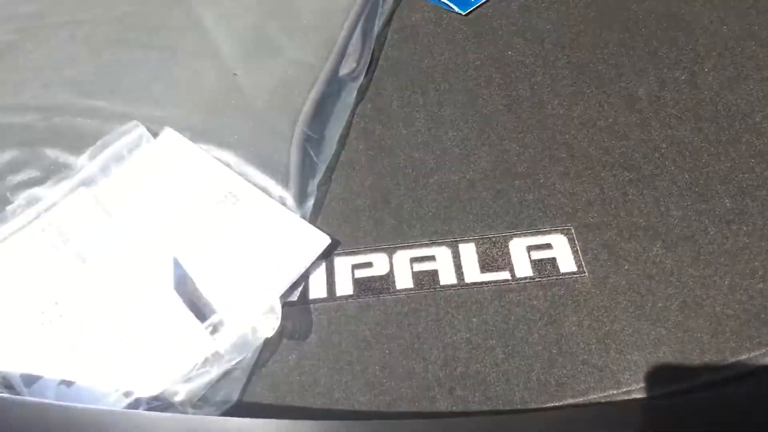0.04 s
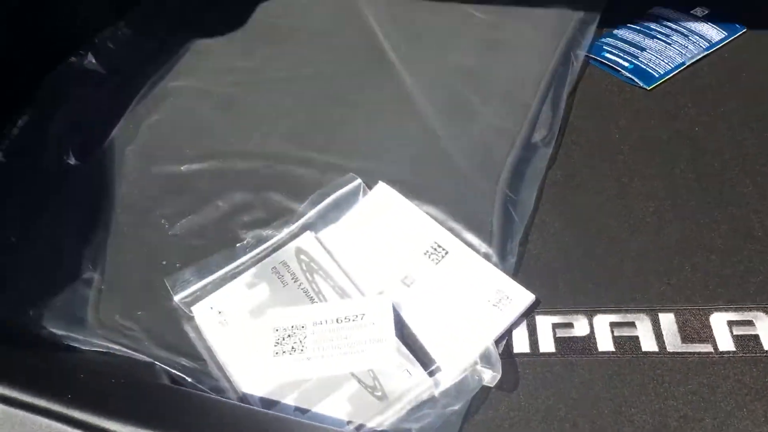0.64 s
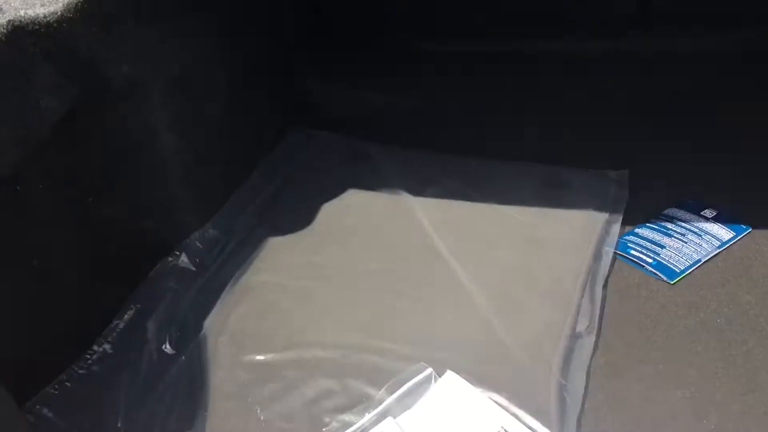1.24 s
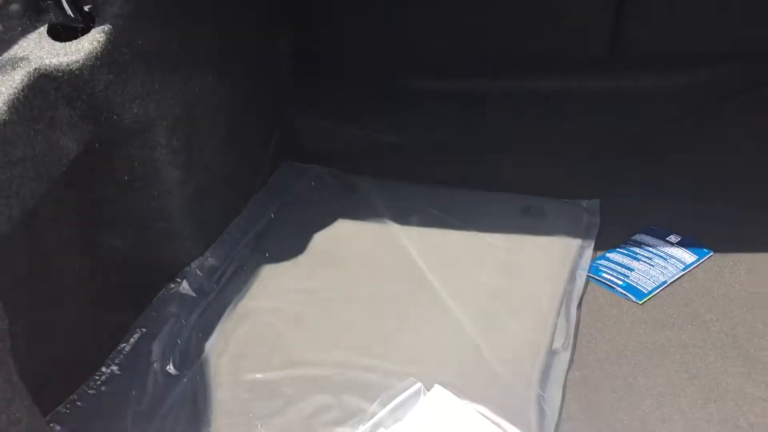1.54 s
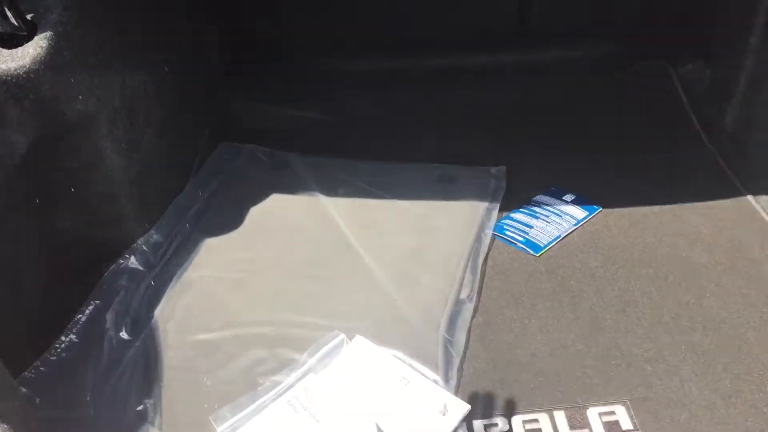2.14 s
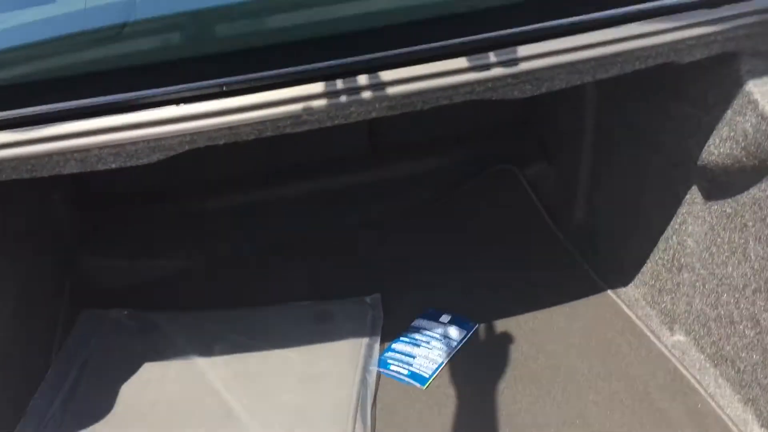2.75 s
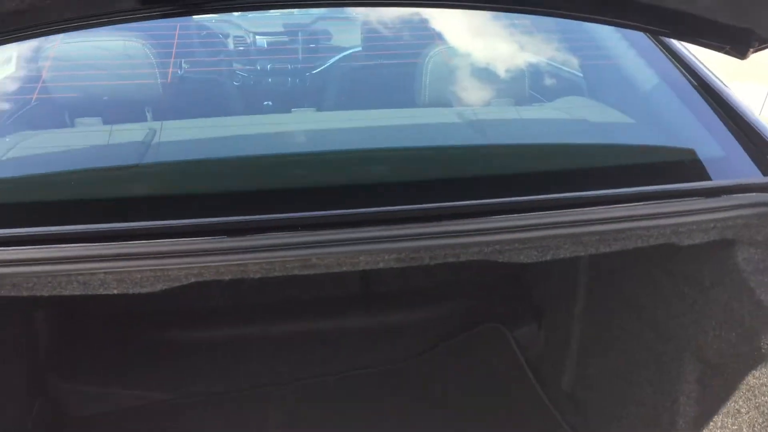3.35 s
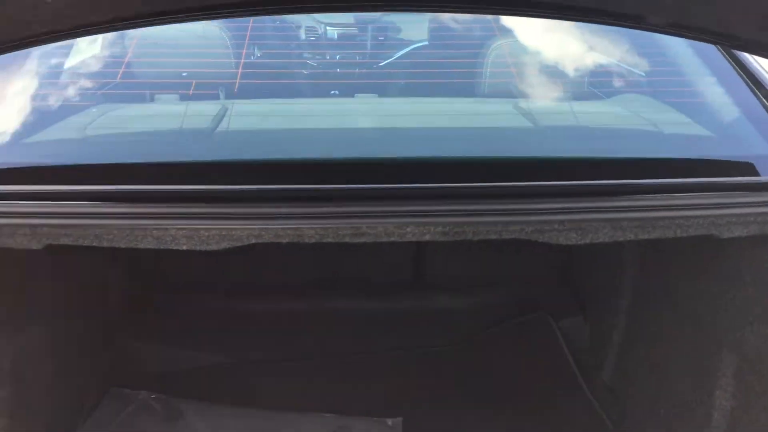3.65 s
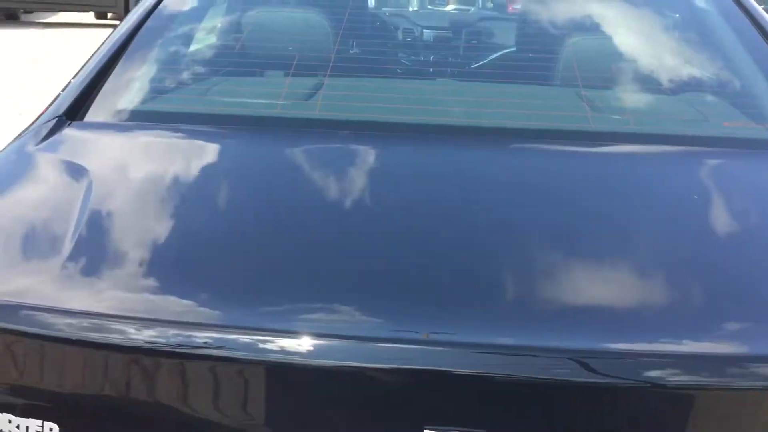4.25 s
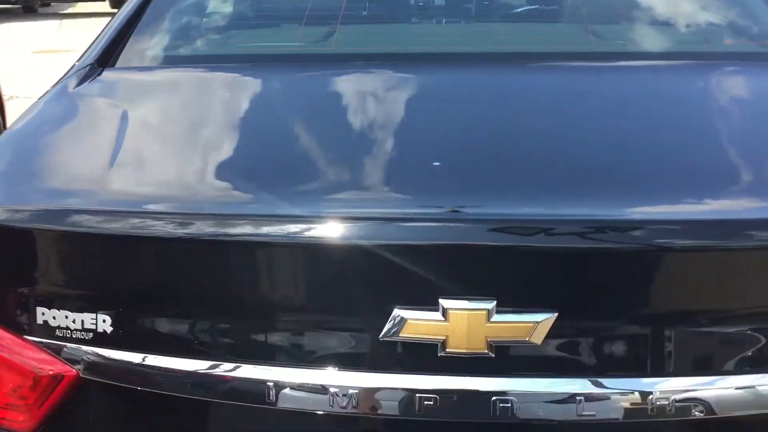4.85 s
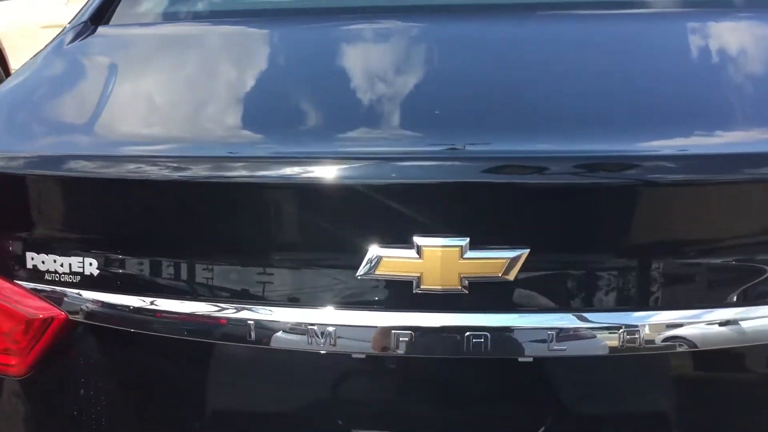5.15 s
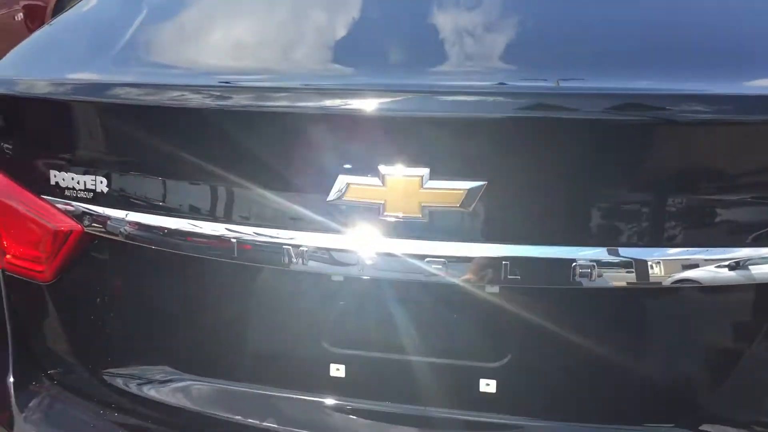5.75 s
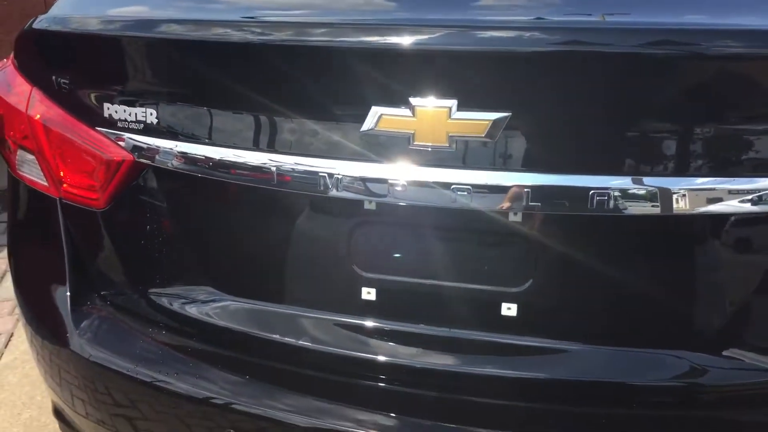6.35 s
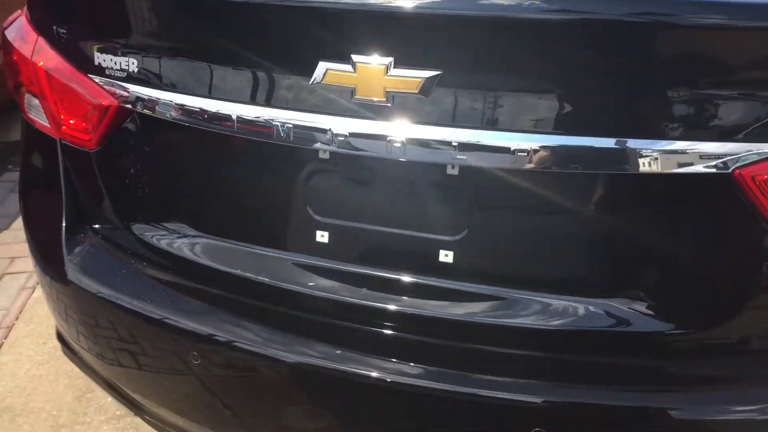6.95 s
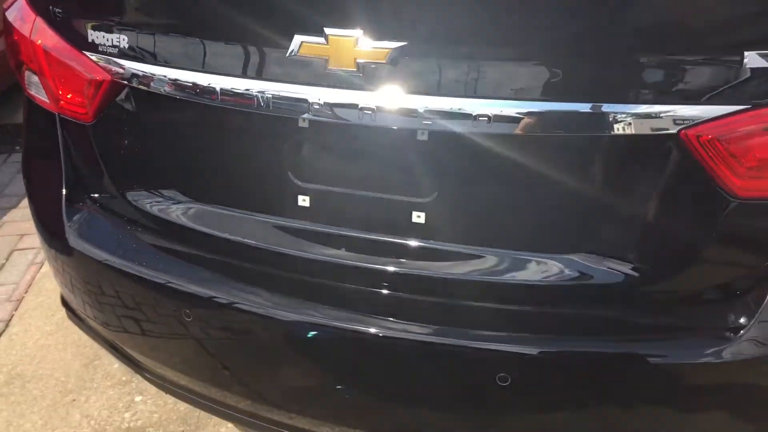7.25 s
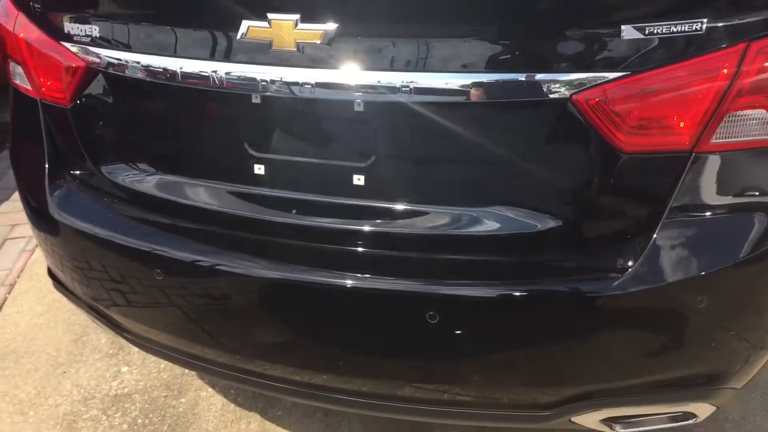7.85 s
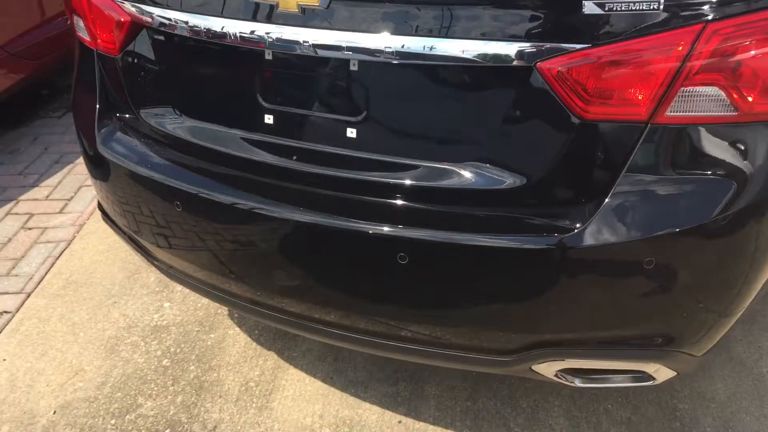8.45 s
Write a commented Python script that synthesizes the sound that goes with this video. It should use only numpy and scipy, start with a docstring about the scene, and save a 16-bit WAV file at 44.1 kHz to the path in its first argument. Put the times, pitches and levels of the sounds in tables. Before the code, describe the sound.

A car engine idles close by outdoors with a steady low hum, while cars swell and fade on a road further off. Someone near the microphone makes faint ticks and rustles. About halfway through, a trunk lid slams shut with a loud thud, a latch click and a short boom. Afterward a heavier vehicle throbs past in the distance and there is one dull knock, with faint hiss and insects behind.

```python
"""A car's boot lid slams outdoors: air rushes out, the latch clicks, the panels ring, the cavity booms.
The slam ducks the gain control and hits a limiter. Someone moving about adds small ticks, rustles
and one dull knock. An engine idles close by, cars swell and fade on a road further off, and a heavier
vehicle throbs past. Behind it all are faint insect chirps, hiss, a thin whine and a few squeaks."""
import sys
import numpy as np
from scipy import signal
from scipy.fft import rfft, irfft, next_fast_len
from scipy.io import wavfile
from scipy.ndimage import uniform_filter1d, minimum_filter1d

SR = 44100
rng = np.random.default_rng(int(sys.argv[2]) if len(sys.argv) > 2 else 0)


def int16_out(signal):
    """Quantize to a 16-bit WAV file."""
    q = np.round(np.clip(np.atleast_2d(signal).T, -1, 1) * 32767)
    wavfile.write(sys.argv[1], SR, q.astype(np.int16))


N = 378819
TIME = np.arange(N) / SR


def lid(click_db=-2, clatter_db=-7, trim_db=-17, rattle_fade_db_per_s=288):
    """The latch meets its striker, the bolt snaps home, and the shut lid rattles ever more weakly."""
    # blows of the closing lid: (time [s], relative levels of latch, bolt, panel, body [dB])
    blows = [(4.2252, -2, -18, -10, -22), (4.2412, -16, -30, -9, -45), (4.244, -5, -7.5, -4, 2.5),
             (4.2498, -7.5, -12, 2.5, -24)]
    # rattles after the blows: (time [s])
    rattle_times = [4.2543, 4.2702, 4.2808, 4.2884, 4.3087, 4.3415]
    # balance of the first rattle: (relative levels of latch, bolt, panel, body [dB])
    rattle_mix = (-19, -15, -6.5, -21)
    # colour of the latch click: (frequency [Hz], level [dB])
    latch_colour = [(180, -27), (300, -15), (814, 0), (1340, -18), (1970, -4), (3080, -18.5), (4020, -16),
                    (4830, -43), (5900, -15.5), (7440, -32), (8360, -17), (9710, -19), (10600, -32),
                    (13100, -21.5), (16000, -28)]
    # modes of the lid and car body: (frequency [Hz], level [dB], t60 [s])
    body_modes = [(138.4, -13, .33), (171.7, -14.5, 0.45), (197.6, -7.5, 0.28), (231.6, -11, 0.41),
                  (256, -13.5, 0.38), (292.7, -18.5, 0.51), (333, -29, 0.27), (363, -18.5, 0.26),
                  (410, -23, .13), (489, -18, .2), (528.5, -21, .19), (608, -18.5, 0.2), (660, -26, 0.25)]
    # modes of the latch plate and trim: (frequency [Hz], level [dB], t60 [s])
    trim_modes = [(755, -9, 0.093), (896, -4, 0.088), (1180, -1.5, 0.087), (1600, -14, 0.13),
                  (1825, -9, .13), (2070, -9, 0.11), (2270, -2, 0.046)]
    body, trim = ring(body_modes, rise_s=0.0013), ring(trim_modes, rise_s=0.0004)
    rattles = [(s, *(np.array(rattle_mix) - rattle_fade_db_per_s * (s - rattle_times[0])))
               for s in rattle_times]
    out = np.zeros(N)
    for s, latch_db, bolt_db, panel_db, body_db in blows + rattles:
        add(out, s, amp(click_db + latch_db) * burst(latch_colour, t60=0.017))
        add(out, s, amp(bolt_db) * burst(hump(centre_hz=4470, octaves=0.68), t60=0.011))
        add(out, s, amp(clatter_db + panel_db) * clatter())
        add(out, s, amp(trim_db + panel_db) * trim)
        add(out, s, -amp(body_db) * body)
    return out


def clatter(rise_s=0.00028):
    """The crowded upper modes of panel and trim, as noise whose low end rings longest."""
    # colour of the struck panel: (frequency [Hz], level [dB])
    colour = [(180, 1), (300, -7), (418, -10.5), (624, -14.5), (1010, -10.5), (1100, -7), (1410, -16.5),
              (1610, -12), (1930, -19.5), (4100, -28), (4750, -35), (6000, -31.5), (16000, -55)]
    # its ring time: (frequency [Hz], t60 [s])
    decay = [(300, 0.4), (1000, 0.12), (3000, 0.17), (8000, 0.16), (15000, 0.24)]
    hz, t, bands = signal.stft(noise(colour, size=2 ** 14), SR, nperseg=2 ** 7)
    fade = amp(-60 * t / read(decay, hz)[:, None])
    tail = signal.istft(bands * fade, SR, nperseg=2 ** 7)[1]
    return tail * (1 - np.exp(-TIME[:len(tail)] / rise_s))


def boom(landing_s=4.258):
    """The lid lands on its seal and the air squeezed in the boot booms."""
    # modes of the boot cavity: (frequency [Hz], level [dB], t60 [s])
    cavity_modes = [(42, -3, 0.079), (60.3, 5.5, 0.13), (75.3, -6, 0.22), (96.7, -4.5, 0.45),
                    (116, -7, .25)]
    out = np.zeros(N)
    add(out, landing_s, -ring(cavity_modes, rise_s=0.0039))
    return out


def swing(level_db=-26.5):
    """Air rushes out faster and faster until the latch meets its striker."""
    # colour of the whoosh: (frequency [Hz], level [dB])
    colour = [(150, -18), (450, 6), (800, -1), (1400, -8), (2500, -26), (5000, -30.5), (16000, -39)]
    return amp(level_db) * swell(peak_s=4.222, rise_db_per_s=520, fall_db_per_s=602) * noise(colour)


def handling(grain_db=3, grain_s=0.0029, tick_width_hz=2800, faint_per_s=1, faint_db=-62):
    """Someone moving about: light ticks and grainy rustles close by, and a dull knock."""
    # small ticks: (time [s], level [dB], centre [Hz], t60 [s])
    ticks = [(.584, -50, 14000, .02), (.757, -46, 12800, .02), (1.076, -55, 9800, .06),
             (1.522, -39.5, 4250, .07), (2.173, -49, 10000, .03), (2.2, -46, 9500, .025),
             (2.267, -42, 4400, .025), (4.057, -44, 14960, .013), (4.485, -51, 10000, 0.014),
             (4.92, -49.5, 8810, 0.05), (5.139, -53.5, 8370, .06)]
    # soft swishes: (start [s], end [s], level [dB], centre [Hz], width [octaves])
    rustles = [(1.852, 1.94, -56, 4800, 0.64), (2.148, 2.283, -60, 7960, .9), (2.304, 2.6, -70, 7400, .27),
               (4.131, 4.217, -53.5, 6000, 1), (4.891, 4.98, -67, 9000, .45),
               (5.047, 5.85, -56, 2140, 0.09), (7.38, 7.44, -58, 4776, 0.48),
               (8.038, 8.114, -56, 5860, 0.52)]
    # contacts of one knock, like a step on paving: (time [s], level [dB])
    contacts = [(7.5049, -27), (7.5104, -43), (7.521, -29.5)]
    # colour of the knock: (frequency [Hz], level [dB])
    knock_colour = [(100, -6), (300, 8), (900, -1), (1800, -8), (3000, -20), (8000, -42), (16000, -50)]
    out = np.zeros(N)
    faint_ticks = [(s, faint_db, 10000, .03) for s in TIME[rng.random(N) < faint_per_s / SR]]
    for s, db in contacts:
        add(out, s, amp(db) * burst(knock_colour, t60=0.079))
    t = TIME[:2 ** 16]
    for start, end, db, centre_hz, octaves in rustles:
        stroke = np.sin(np.pi * np.clip(t / (end - start), 0, 1))
        grains = np.interp(t / grain_s, np.arange(2 ** 10), rng.standard_normal(2 ** 10))
        swish = noise(hump(centre_hz, octaves), size=len(t))
        add(out, start, amp(db) * stroke * unit_rms(amp(grain_db * grains)) * swish)
    for s, db, centre_hz, t60 in ticks + faint_ticks:
        octaves = np.log2(1 + tick_width_hz / centre_hz)
        add(out, s, amp(db) * burst(hump(centre_hz, octaves), t60))
    return out


def engine(idle_hz=33.8, drift=0.00598, exhaust_db=-40, lump_db=0.5):
    """Idle orders on one wavering firing rate, over the lumpy rumble of the exhaust."""
    # engine orders: (multiple of the firing rate, level [dB], roughness [0-1])
    orders = [(1, -44.5, 0.05), (2, -50, 0.94), (3, -43.5, 0.2), (7, -45.5, 0.53), (8, -42.5, 0.66)]
    # the engine's upper hum fades as the boot shuts, then partly returns: (time [s], gain [dB])
    upper_hum = [(0, 3.5), (3.3, -0.5), (4.7, -6), (8.6, -2.5)]
    # colour of the exhaust: (frequency [Hz], level [dB])
    exhaust_colour = [(20, -24), (29, -28), (42, -17), (60, -1), (78, 2.5), (95, -4.5), (120, -0.5),
                      (150, -9), (250, -10), (400, -41), (1000, -69)]
    firing_hz = idle_hz * (1 + drift * wander(1.186))
    out = amp(exhaust_db + lump_db * wander(22.0)) * noise(exhaust_colour)
    for order, db, rough in orders:
        hum_db = curve(upper_hum) * (order > 4)
        out += amp(db + hum_db) * tone(order * firing_hz, rough, width_hz=9)
    return out


def traffic(far_road_db=-54.5, wash_db=-51, flutter_db=0.79):
    """Each car's roar swells and fades with distance; the loudest tyres lead the pitch of the song."""
    # passing cars: (nearest at [s], time to fall 3 dB [s], roar [dB], tyre song [dB], song pitch [Hz])
    cars = [(.4, 0.77, -45, -45, 846), (1.58, 0.43, -42.5, -44, 1051), (2.6, 0.44, -40.5, -39, 978),
            (3.25, 0.28, -42.5, -43, 879), (4.07, .15, -47, -43, 997), (4.78, 0.1, -45, -49, 1026),
            (8.4, 0.3, -52.5, -71, 950)]
    # colour of the road roar: (frequency [Hz], level [dB])
    road_colour = [(180, -7.5), (300, 2.5), (398, 0.5), (469, -5), (630, 3.5), (788, -1.5), (962, 0),
                   (1220, -3), (1800, -12.5), (2560, -27), (4390, -49), (5000, -111), (6500, -56),
                   (11000, -120)]
    roar_power, song_power, pitch_sum = amp(far_road_db) ** 2, 0, 0
    for s, half_s, roar_db, song_db, song_hz in cars:
        near = pass_by(s, half_s)
        roar_power += (amp(roar_db) * near) ** 2
        song = (amp(song_db) * near ** 2) ** 2
        song_power += song
        pitch_sum += song * song_hz
    roar = np.sqrt(roar_power) * noise(road_colour, above_hz=686)
    # the tyre wash of a slow car further off
    roar += amp(wash_db) * pass_by(nearest_s=4.8, half_s=0.8) * noise(hump(centre_hz=1090, octaves=0.31))
    tread = np.sqrt(song_power) * whistle(pitch_sum / song_power, width_hz=110)
    return (bodywork(roar) + tread + car_drone()) * amp(flutter_db * wander(10))


def car_drone(nearest_s=2.92, level_db=-42, pitch_hz=413.3, climb_hz_per_s=35):
    """The nearest car drones, rising in pitch as it gathers speed."""
    hz = pitch_hz + climb_hz_per_s * (TIME - nearest_s)
    return amp(level_db) * pass_by(nearest_s, half_s=0.53) ** 3 * whistle(hz, width_hz=60)


def heavy_vehicle(throb_hz=76.2, drift=0.0251, tone_db=-34, rumble_db=-34.5):
    """Only the bass carries from a distant pass: an unsteady firing tone in a band of rumble."""
    # colour of the rumble: (frequency [Hz], level [dB])
    colour = [(25, -38), (38, -18), (52, 8.5), (70, -3.5), (88, 1.5), (105, -4.5), (160, -38), (500, -74)]
    rumble = noise(colour)
    firing = tone(throb_hz * (1 + drift * wander(1.504)), rough=0.64, width_hz=8.6)
    return pass_by(nearest_s=7.13, half_s=1.12) * (amp(tone_db) * firing + amp(rumble_db) * rumble)


def insects(length_s=0.046, spread_db=2, blur_s=0.0027):
    """Short faint chirps at chance moments, each at its own pitch and blurred by distance."""
    # bouts of chirping: (start [s], end [s], pitch [Hz], scatter [Hz], level [dB], rate [1/s])
    bouts = [(.9, 4.1, 6100, 150, -80, 20), (4.6, 8.6, 6100, 110, -75, 20), (4.6, 8.6, 5850, 60, -74, 15),
             (5.2, 7.1, 4500, 70, -72, 14)]
    out = np.zeros(N)
    shape = unit_rms(np.hanning(round(length_s * SR)))
    t = TIME[:len(shape)]
    for start, end, hz, scatter_hz, db, rate in bouts:
        draws = rng.standard_normal((2 ** 8, 2 ** 5))
        for s, (late, detune, accent, *blur) in zip(np.arange(start, end, 1 / rate), draws):
            smear = np.interp(t / blur_s, np.arange(len(blur)), blur)
            chirp = shape * np.sqrt(2) * np.sin(2 * np.pi * (hz + scatter_hz * detune) * t + smear)
            add(out, abs(s + .5 * late / rate), amp(db + spread_db * accent) * chirp)
    return out


def outdoors(air_gain_db=-1.5, whine_start_s=6.8, whine_db=-74, waver_db=4):
    """A bed of distant hiss, a wavering far whine and a few thin squeaks."""
    # colour of the open air: (frequency [Hz], level [dB])
    air_colour = [(90, -22), (150, -1), (190, -3), (254, -2.5), (321, -11), (422, -18), (600, -17),
                  (1360, -21), (2180, -25.5), (4300, -35), (5000, -42), (6100, -38.5), (7000, -43.5),
                  (9500, -46.5), (10400, -53), (11500, -49), (16000, -54.5)]
    # contour of the hiss above 3 kHz: (time [s], relative level [dB])
    air_contour = [(0, -65), (2.3, -59), (3.9, -60.5), (8.6, -59.5)]
    # brief squeaks: (time [s], pitch [Hz], level [dB])
    squeaks = [(1.297, 6140, -46), (6.925, 4400, -54), (7.146, 2320, -50)]
    out = amp(air_gain_db + curve(air_contour)) * bodywork(noise(air_colour, above_hz=2985))
    whine = amp(whine_db + waver_db * wander(1.5)) * whistle(hz=5040, width_hz=41)
    out += (TIME > whine_start_s) * whine
    for s, hz, db in squeaks:
        out += amp(db) * swell(s, rise_db_per_s=900, fall_db_per_s=400) * whistle(hz, width_hz=120)
    return out


def bodywork(x):
    """Short reflections that shift as the microphone moves comb the sound into drifting ripples."""
    # reflections off the bodywork: (delay [ms], gain)
    echoes = [(2.3, 0.16), (3.9, 0.22), (5.6, 0.23), (8.5, 0.2)]
    out = x.copy()
    for delay_ms, gain in echoes:
        lag_s = delay_ms / 1000 * (1 + .1 * wander(.4))
        out += gain * np.interp(TIME - lag_s, TIME, x)
    return out * np.std(x) / np.std(out)


def ring(modes, rise_s):
    """Damped modes set going by a push of finite length."""
    t = TIME[:SR]
    ringing = sum(amp(db - 60 * t / t60) * np.sin(2 * np.pi * hz * t) for hz, db, t60 in modes)
    return ringing * (1 - np.exp(-t / rise_s))


def burst(spectrum, t60, rise_s=0.00054):
    """A short puff of coloured noise that dies away."""
    t = TIME[:2 ** 13]
    return noise(spectrum, size=len(t)) * amp(-60 * t / t60) * (1 - np.exp(-t / rise_s))


def tone(hz, rough, width_hz):
    """An engine line of rms 1: part clean sine, part narrow noise."""
    line = np.sqrt(2) * np.sin(2 * np.pi * (np.cumsum(hz) / SR + rng.random()))
    return np.sqrt(1 - rough ** 2) * line + rough * whistle(hz, width_hz)


def whistle(hz, width_hz):
    """Noise in one narrow resonance that may move."""
    phase = 2 * np.pi * np.cumsum(hz * np.ones(N)) / SR
    return unit_rms(wander(width_hz / 2) * np.cos(phase) + wander(width_hz / 2) * np.sin(phase))


def noise(spectrum, size=N, above_hz=0):
    """Noise of a given colour, with rms 1 in the part above a frequency."""
    n = next_fast_len(size, real=True)
    hz = np.fft.rfftfreq(n, 1 / SR)
    gain = amp(read(spectrum, hz))
    band_rms = np.sqrt(np.mean((gain * (hz >= above_hz)) ** 2))
    return irfft(rfft(rng.standard_normal(n)) * gain, n)[:size] / band_rms


def hump(centre_hz, octaves):
    """A spectrum with one rounded peak."""
    hz = np.geomspace(200, SR / 2, 300)
    return np.c_[hz, -20 * np.log10(1 + (np.log2(hz / centre_hz) / octaves) ** 2)]


def wander(rate_hz):
    """Smooth random drift of rms 1, up to about the given rate."""
    hz = np.fft.rfftfreq(2 ** 14, 2 ** -10)
    slow = irfft(rfft(rng.standard_normal(2 ** 14)) / np.sqrt(1 + (hz / rate_hz) ** 4))
    return np.interp(TIME, np.arange(2 ** 14) / 2 ** 10, unit_rms(slow))


def pass_by(nearest_s, half_s):
    """Gain of a source that drives past in a straight line: one over its distance."""
    return 1 / np.hypot(1, (TIME - nearest_s) / half_s)


def swell(peak_s, rise_db_per_s, fall_db_per_s):
    """Gain that climbs to 1 at a given moment and then dies away."""
    down_db = np.maximum((peak_s - TIME) * rise_db_per_s, (TIME - peak_s) * fall_db_per_s)
    return amp(-np.minimum(down_db, 200))


def amp(db):
    """Decibels to gain."""
    return np.exp(np.asarray(db) * np.log(10) / 20)


def unit_rms(x):
    """Scales to rms 1."""
    return x / np.sqrt(np.mean(x ** 2) + 1e-20)


def read(points, hz):
    """Reads a table on a log-frequency axis."""
    point_hz, value = np.transpose(points)
    return np.interp(np.log(hz + 1), np.log(point_hz + 1), value)


def curve(rows):
    """A time table at every sample."""
    return np.interp(TIME, *np.transpose(rows))


def add(mix, s, sound):
    """Mixes a sound in at time s."""
    part = mix[round(s * SR):][:len(sound)]
    part += sound[:len(part)]


def scene():
    """All sources at one microphone."""
    slam = swing() + lid() + boom()
    return (slam + handling() + engine() + traffic() + heavy_vehicle() + insects() + outdoors())[None]


def record(dry, threshold_db=-17, recovery_db_per_s=24, squeeze=0.16, attack_s=0.026,
           low_cut_hz=30, high_cut_hz=15900):
    """Gain control ducks after the slam, a fast limiter flattens its peaks, and the band is limited."""
    x = signal.sosfilt(signal.butter(2, low_cut_hz, "high", fs=SR, output="sos"), dry[0])
    power_db = 10 * np.log10(abs(uniform_filter1d(x ** 2, size=900)) + 1e-12)
    fall_db = TIME * recovery_db_per_s
    held_db = np.maximum.accumulate(power_db + fall_db) - fall_db
    over_db = np.maximum(held_db - threshold_db, 0)
    pole = np.exp(-1 / (attack_s * SR))
    ducked = x / amp(squeeze * signal.lfilter([1 - pole], [1, -pole], over_db))
    limiter_gain = minimum_filter1d(1 / np.maximum(abs(ducked), 1), size=31)
    limited = ducked * uniform_filter1d(limiter_gain, size=31)
    high_cut = signal.firwin(511, high_cut_hz, window=("kaiser", 9), fs=SR)
    return signal.oaconvolve(limited, high_cut, "same")[None]


dry = scene()
out = record(dry)
int16_out(out)
```